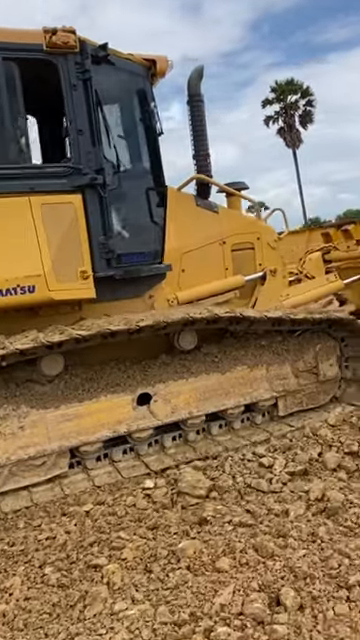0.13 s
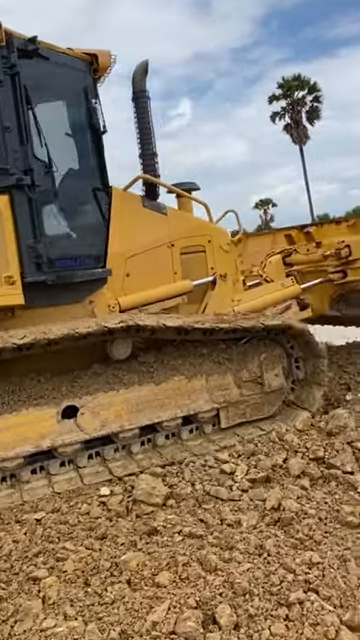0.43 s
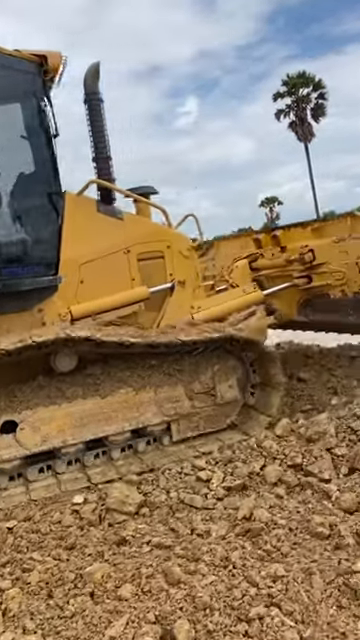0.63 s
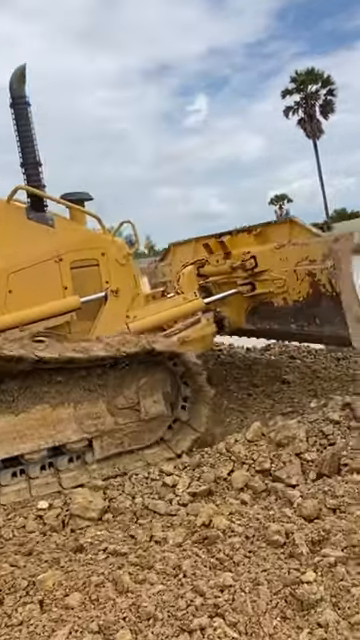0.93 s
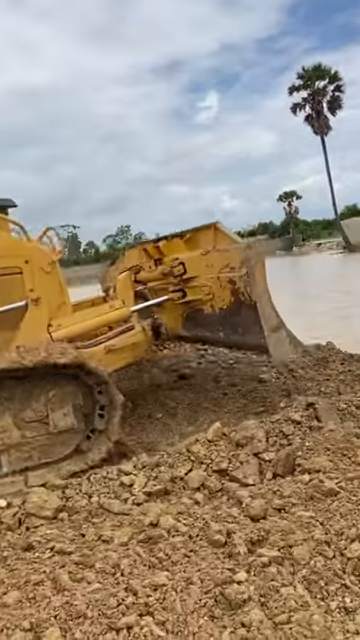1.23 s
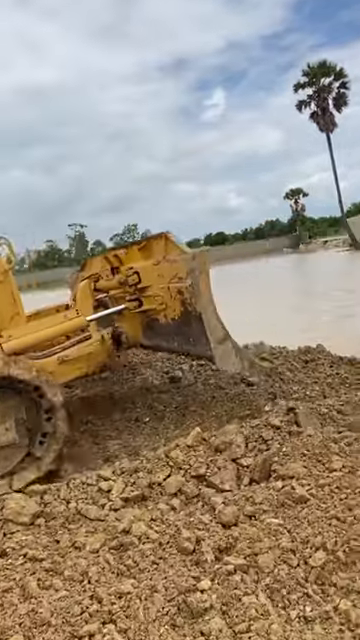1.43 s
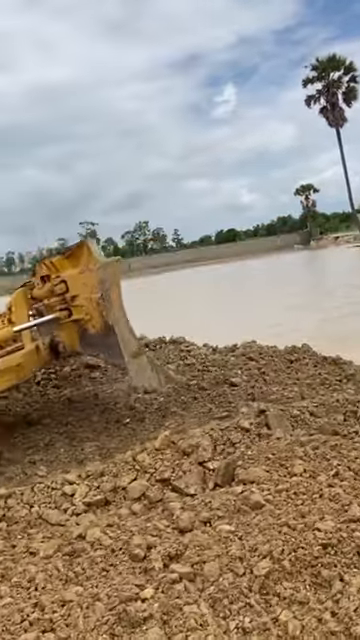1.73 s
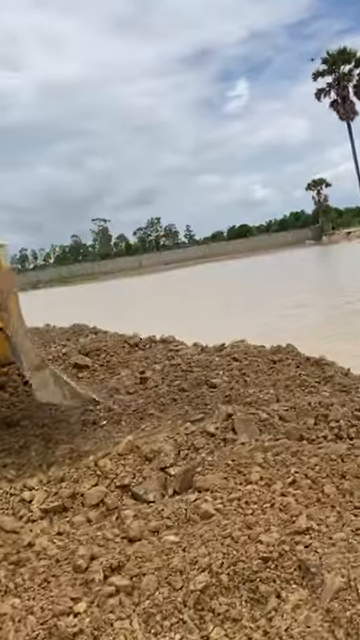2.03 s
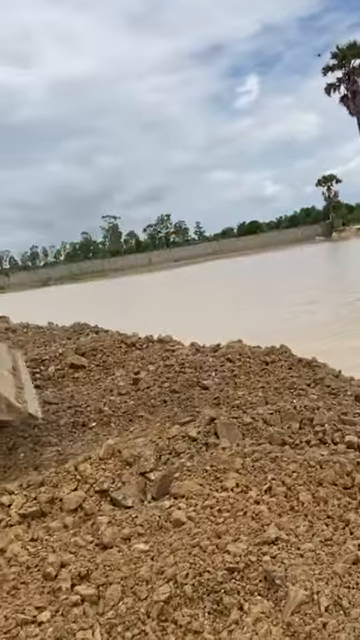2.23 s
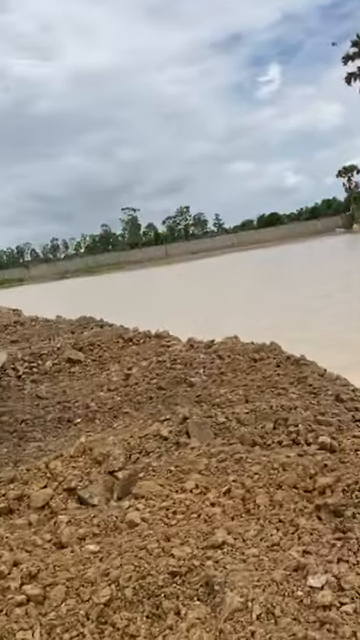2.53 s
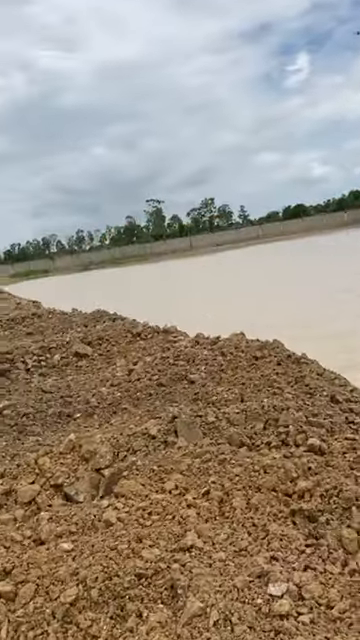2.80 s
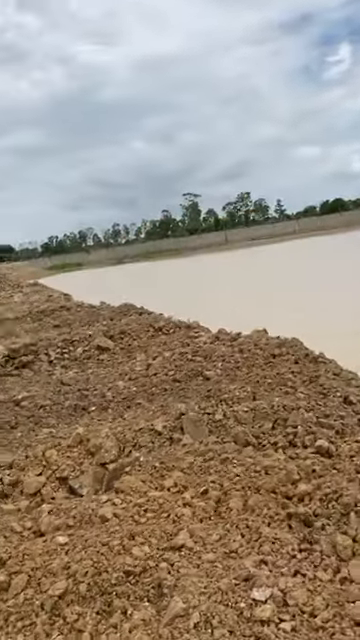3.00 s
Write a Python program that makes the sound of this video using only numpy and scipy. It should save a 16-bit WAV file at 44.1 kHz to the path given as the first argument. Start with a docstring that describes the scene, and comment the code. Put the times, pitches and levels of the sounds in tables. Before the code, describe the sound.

A bulldozer's diesel engine hums low and roars continuously, close and outdoors, with the bass heavier on the left. The hum rises from a quieter start. Track knocks begin around 0.45 s, cluster at 0.9-1.2 s, then return from 1.75 s, strongest near 2.4 s, over constant fine clatter. A short groan comes at 0.65 s, with faint squeaks scattered after. Gravel crunches at 2.6-3.1 s as a hollow resonance grows; slight wind brushes the right.

```python
"""Tracked diesel machine backing away

A heavy machine moves over broken ground, close to a small two-port microphone. Steered sines make the deep
hum, engine orders and drive tones; coloured noise makes the roar. Blows on damped modes make the track knock
and clatter, gliding sines make it groan and squeak, and bursts of ringing grains make gravel crunch.
A hollow band of noise grows, and a little wind noise brushes the right port."""
import sys
import numpy as np
from scipy import signal
from scipy.fft import rfft, irfft
from scipy.io import wavfile
from scipy.ndimage import uniform_filter1d

SR = 44100
rng = np.random.default_rng(int(sys.argv[2]) if len(sys.argv) > 2 else 0)


def wrap_up_sound(samples):
    """Save the sound to the file named by the first command line argument, as 16-bit audio."""
    columns = np.atleast_2d(samples).T
    # keep every value between -1 and 1, then stretch to whole-number steps
    tamed = np.clip(columns, -1, 1)
    steps = np.round(tamed * 32767).astype(np.int16)
    wavfile.write(sys.argv[1], SR, steps)


N = 139356
T = np.arange(N) / SR  # time, s
HZ = np.fft.rfftfreq(N, 1 / SR)  # frequency of each spectral bin, Hz

# Deep exhaust hum: time_s, pitch_hz, level_db
HUM = [(0, 95.9, -36.5), (.16, 97.87, -28), (.3, 90.6, -17.5), (.4, 90.84, -24), (.5, 94.74, -19),
       (.63, 96.96, -26.5), (.7, 94.15, -38.5), (.85, 94.2, -28.5), (1.0, 96.2, -26), (1.15, 94.05, -20.5),
       (1.42, 96.9, -21.5), (1.6, 97.2, -20.5), (2.1, 96.1, -20), (2.2, 94.33, -18), (2.32, 93.3, -15.5),
       (2.6, 92, -16), (2.85, 93.5, -15.5), (3.16, 96.2, -16)]
# Course of the three noise bands: time_s, rumble_db, roar_db, hiss_db
LEVELS = [(0, -36, -32.5, -46), (.3, -28, -29.5, -44), (.55, -29.5, -26, -45.5), (1.2, -28.5, -27.5, -45.5),
          (1.7, -30.5, -26.5, -49.5), (2.2, -30.5, -27, -47), (2.7, -32.5, -26.5, -45),
          (3.16, -35, -27, -46)]
# Modes of a track link, before detuning: frequency_hz, relative_level_db, t60_s
TRACK = [(584, 9.5, 0.028), (725, 12, 0.045), (1080, 8, 0.052), (1370, -3.5, 0.013), (1592, 0, 0.026),
         (2100, -15, 0.059)]
BLOW_S = .0003  # softness of a blow's onset


def amp(db):
    """Level law: decibels to an amplitude ratio."""
    return 10 ** (np.asarray(db) / 20)


def evened(x):
    """Power normalization: scales to rms 1."""
    return x / np.sqrt(np.mean(x ** 2) + 1e-20)


def col(table, k, at=T, log=False):
    """Linear interpolation of column k along time, or along log frequency."""
    rows = np.array(table, float)
    places = rows[:, 0]
    if log:
        at, places = np.log(at + 1), np.log(places + 1)
    return np.interp(at, places, rows[:, k])


def slow(hz):
    """Random modulation: noise low-passed near hz, at rms 1."""
    spectrum = rfft(rng.standard_normal(N))
    return evened(irfft(spectrum / (1 + (HZ / hz) ** 4), N))


def tone(hz, db):
    """Frequency modulation: a sine whose phase integrates its pitch, at an rms level."""
    cycles = np.cumsum(hz * np.ones(N)) / SR + rng.random()
    return np.sqrt(2) * amp(db) * np.sin(2 * np.pi * cycles)


def gate(start, length):
    """Amplitude envelope: a rounded on-off window."""
    phase = np.clip((T - start) / length, 0, 1)
    return np.sin(np.pi * phase) ** .5 * (T < start + length)


def clicks(rate, spread_db):
    """Shot noise: random impulses of either sign and uneven size."""
    present = rng.random(N) < rate / SR
    size_db = spread_db * np.minimum(rng.exponential(1, N), 4)
    return present * rng.choice([-1., 1.], N) * amp(size_db)


def engine():
    """Periodic excitation: a gliding hum, steady shaft orders and two wavering drive tones."""
    # Shaft orders: order, start_db, middle_db, end_db
    orders = [(3, -39.5, -50.5, -40.5), (4, -36, -35, -70.5)]
    # Drive whine: time_s, pitch_hz, level_db
    whine = [(0, 325, -35), (.27, 315, -32), (.39, 308, -44), (.55, 319, -32), (.9, 320, -34),
             (1.9, 321, -48)]
    # Second drive tone: time_s, pitch_hz, level_db
    drone = [(0, 342, -48), (1.201, 344.7, -47), (2.2, 348, -45.5)]
    shaft_hz, waver_db, waver_hz = 48.0, 1.5, 1.2  # wavers are rms
    out = tone(col(HUM, 1), col(HUM, 2))
    for order, *db in orders:
        level_db = np.interp(T, [0, T[-1] / 2, T[-1]], db)
        out = out + tone(order * shaft_hz, level_db + waver_db * slow(1.0))
    for table in (whine, drone):
        fade_db = -40 * np.maximum(T - table[-1][0], 0)  # 40 dB per second after the last row
        pitch_hz = col(table, 1) + waver_hz * slow(4.9)
        out = out + tone(pitch_hz, col(table, 2) + fade_db + waver_db * slow(3.2))
    return out


def roar():
    """Modulated broadband noise: two copies share throb and patches, but not their noise and grit."""
    # Spectral colour, before each band is levelled: frequency_hz, density_db (per Hz)
    colour = [(20, -96.5), (45, -52), (70, -44), (170, -44.5), (340, -46), (450, -53.5), (650, -48.5),
              (1170, -54.5), (1550, -60), (2330, -63.5), (2700, -74), (3250, -85.5), (3900, -80),
              (4600, -83), (6900, -88), (8600, -100), (9300, -112)]
    split_hz = (450, 3150)
    patch_db, flicker_db = 1.77, 0.5  # rms
    grit_per_s, grit_spread_db, grit_share = 900, 1, 0.21  # share of power
    links_per_s, link_swell_db, firing_db = 5.96, 0.5, 1  # peak swells
    link_swell = np.cos(2 * np.pi * links_per_s * (T - 1.9))
    firing = np.cos(2 * np.pi * np.cumsum(col(HUM, 1)) / SR)  # one throb per cycle of the hum
    throb = amp(flicker_db * slow(60.0) + link_swell_db * link_swell + firing_db * firing)

    # patches of level over frequency bins and time frames
    patch = uniform_filter1d(rng.standard_normal((257, N // 128 + 2)), size=5, axis=0)
    patch = evened(uniform_filter1d(patch, size=12, axis=1))
    low, high = (1 / (1 + (HZ / f) ** 8) for f in split_hz)
    out = np.zeros((2, N))
    for ch in range(2):
        grit = evened(clicks(grit_per_s, grit_spread_db))
        x = np.sqrt(1 - grit_share) * rng.standard_normal(N) + np.sqrt(grit_share) * grit
        z = signal.stft(x * throb, nperseg=512, noverlap=384)[2]
        z = z * amp(patch_db * patch[:, :z.shape[1]])
        x = signal.istft(z, nperseg=512, noverlap=384)[1][:N]
        coloured = rfft(x) * amp(col(colour, 1, HZ, True))
        for k, band in enumerate((low, high - low, 1 - high)):
            out[ch] += evened(irfft(coloured * band, N)) * amp(col(LEVELS, k + 1))
    return out


def knocks():
    """Modal impact: a link lands with a blunt blow and short rattle that ring the track's modes."""
    # Knocks: start_s, peak_db (ahead of the ports), brightness_db (per octave about 1 kHz)
    blows = [(0.444, -15.5, 1), (.541, -14.5, 6), (.905, -23, 15.5), (0.94, -13.5, 12), (1.055, -13.5, -8),
             (1.086, -12.5, -2.5), (1.187, -10.5, 10), (1.222, -12.5, 4.5), (1.757, -12.5, 7.5),
             (1.781, -12.5, -1.5), (1.893, -9, -1), (2.046, -11.5, -4), (2.129, -14.5, 4.5), (2.367, -5, 0),
             (2.384, -17.5, -13.5), (2.536, -11.5, 2.5), (2.553, -10.5, -10), (2.856, -13, -5),
             (3.002, -12.5, 2.5)]
    taps_per_s, rattle_s = 600, .009  # rattle_s is the decay time constant
    t, out = T[:4000], np.zeros(N)
    for start_s, db, tilt_db in blows:
        sparse = rng.random(1500) < taps_per_s / SR
        taps = rng.standard_normal(1500) * sparse * np.exp(-t[:1500] / rattle_s)
        taps[0] = 1.64  # the first blow
        ring = np.zeros(len(t))
        for f, mode_db, t60 in TRACK:
            decay = amp(mode_db + tilt_db * np.log2(f / 1000) - 60 * t / t60)
            ring += decay * np.sin(2 * np.pi * f * rng.uniform(0.943, 1.05) * t)
        blunt = 1 - np.exp(-(t / BLOW_S) ** 2)
        first = round(start_s * SR)
        hit = signal.fftconvolve(taps, ring * blunt)[:N - first]
        out[first:][:len(hit)] += amp(db) * hit / abs(hit).max()
    return out


def clatter():
    """Modal shot noise: countless small taps between the links, in clumps, following the roar's level."""
    taps_per_s, spread_db = 80, 3.2  # for each detuned mode
    below_roar_db, clump_db = -7, 2.0  # clumps are rms
    t, out = T[:2000], np.zeros(N)
    blunt = 1 - np.exp(-(t / BLOW_S) ** 2)
    for f, mode_db, t60 in TRACK:
        for detune in rng.uniform(0.873, 1.148, size=2):
            ring = amp(mode_db - 60 * t / t60) * np.sin(2 * np.pi * f * detune * t) * blunt
            out += signal.oaconvolve(clicks(taps_per_s, spread_db), ring)[:N]
    return evened(out) * amp(col(LEVELS, 2) + below_roar_db + clump_db * slow(6.4))


def rubs():
    """Frictional tones of slipping pins: low groans with an overtone, thin squeaks that sag in pitch."""
    # Groans: start_s, length_s, level_db, from_hz, to_hz
    groans = [(0.646, 0.063, -16, 650, 693), (.72, 0.08, -31.5, 669, 620), (0.787, 0.045, -26, 583.6, 692)]
    # Squeaks: start_s, length_s, level_db, pitch_hz (at mid-length)
    squeaks = [(0.706, 0.071, -41, 4790), (0.838, 0.013, -37, 4750), (0.876, .032, -35.5, 4600),
               (0.99, 0.08, -37.5, 4700), (1.165, .042, -38, 4495), (2.142, .016, -40, 4250),
               (2.364, 0.02, -43, 3830), (2.382, .028, -46, 4960), (2.487, .02, -45, 4800),
               (2.748, 0.016, -44, 5390), (2.763, .014, -39, 4100), (2.684, 0.026, -47, 6600),
               (2.84, .022, -46, 6350), (3.026, .02, -48, 6650)]
    sag_per_s = .45  # share of pitch lost per second
    quiver_hz_s2 = .035  # divided by length squared, so short slips are rough
    out = np.zeros(N)
    wobble, grind, overtone, quiver, flutter = (slow(hz) for hz in (70.0, 69.0, 40.0, 260.0, 100.0))
    for start_s, length_s, db, from_hz, to_hz in groans:
        hz = np.interp(T, [start_s, start_s + length_s], [from_hz, to_hz]) + 25 * wobble
        voice = tone(hz, db + 2.7 * grind) + tone(1.85 * hz, db - 15 + 3 * overtone)
        out += gate(start_s, length_s) * voice
    for start_s, length_s, db, hz in squeaks:
        sag = 1 - sag_per_s * np.clip(T - start_s - length_s / 2, -1, 1)
        pitch_hz = hz * sag + quiver_hz_s2 / length_s ** 2 * quiver
        out += gate(start_s, length_s) * tone(pitch_hz, db + 5.3 * flutter)
    return out


def gravel():
    """Granular excitation: grains with short resonant rings, in bursts where stones shift and break."""
    # Crunch colour: frequency_hz, relative_level_db
    colour = [(1150, 4), (2020, -8), (2600, -21), (3200, -23), (4400, -12), (5300, -23), (6570, -19),
              (8300, -39.5)]
    # Crunches: start_s, length_s, level_db
    bursts = [(2.573, 0.02, -33.5), (2.634, 0.041, -31.5), (2.745, 0.042, -25.5), (2.858, .026, -22.5),
              (2.882, 0.044, -22), (3.069, 0.012, -31)]
    rings = 0
    for f in np.geomspace(1100, 8500, num=16):
        resonance = 1 / (1 + 1j * (HZ - f) / (0.05 * f))
        rings = rings + rfft(clicks(600.0, 3.0)) * resonance
    high_pass = 1 / (1 + (900 / (HZ + 1)) ** 4)
    grains = evened(irfft(rings * amp(col(colour, 1, HZ, True)) * high_pass, N))
    return grains * sum(amp(db) * gate(start_s, length_s) for start_s, length_s, db in bursts)


def boom():
    """Band resonance: noise in one narrow, hollow band that grows."""
    # Course of the band: time_s, level_db
    course = [(0, -55), (1.2, -47), (2.6, -38), (3.16, -39)]
    centre_hz, half_width_hz = 408, 24
    band = rfft(rng.standard_normal(N)) / (1 + ((HZ - centre_hz) / half_width_hz) ** 2)
    return evened(irfft(band, N)) * amp(col(course, 1))


def ground(x):
    """Dispersive scatter off the stones: each pitch arrives after its own short delay."""
    delay_s = 0.00377 * np.interp(HZ, np.arange(0, SR / 2, 300), rng.random(74))
    phase = 2 * np.pi * np.cumsum(delay_s) * SR / N  # group delay integrated over frequency
    return irfft(rfft(x) * np.exp(-1j * phase), N)


def wind():
    """Turbulent pressure noise: low-frequency noise with a lumpy level."""
    # Gusts: time_s, level_db (before the lumps)
    gusts = [(0, -47.5), (2.1, -46.5), (2.25, -40), (2.45, -57), (3.16, -57)]
    band = (HZ / (HZ + 60)) ** 3 / (1 + (HZ / 260) ** 2)
    low = irfft(rfft(rng.standard_normal(N)) * band, N)
    return evened(low) * amp(col(gusts, 1) + 7.5 * slow(63.0))


def scene():
    """Partial coherence: two ports hear partly the same sound, with their own balance and phase."""
    # Port contrast: frequency_hz, left_minus_right_db, likeness (0 to 1), left_lead_rad
    ports = [(40, 31, .9, -1.5), (97, 14.5, 0.95, 0.36), (164, 23, 1, 1.5), (233, 17, 0.18, -0.5),
             (370, 20.5, 1, -6.3), (470, 10.5, 1, 0.58), (1095, 1, 0.65, 0.2), (1490, -12, 0.06, -2.2),
             (2050, -3, 0.68, -0.4), (3420, -1, 0.23, -4.5), (4680, -9.5, 0.042, 4), (10300, 0.5, 0.1, 12)]
    track = knocks() + clatter() + gravel() + boom()
    near, scattered = roar() + [track, ground(track)]
    tilt_db, like, lead = (col(ports, k, HZ, True) for k in (1, 2, 3))
    tones = rfft(engine() + rubs())
    near, scattered = rfft(near), rfft(scattered)
    left = (near + tones) * amp(tilt_db / 2)
    common = (like * near + tones) * np.exp(-1j * lead)
    right = (common + np.sqrt(1 - like ** 2) * scattered) * amp(-tilt_db / 2)
    return irfft([left, right], N) + [np.zeros(N), wind()]


def record(dry):
    """Saturation and band limiting: a soft ceiling on the peaks, then a low-pass filter."""
    ceiling, edge_hz = .93, 9250  # ceiling as a share of full scale
    soft = dry / (1 + abs(dry / ceiling) ** 6) ** (1 / 6)
    low_pass = signal.firwin(511, edge_hz, window=("kaiser", 9), fs=SR)
    return signal.oaconvolve(soft, low_pass[None], "same")


dry = scene()
out = record(dry)
wrap_up_sound(out)
```